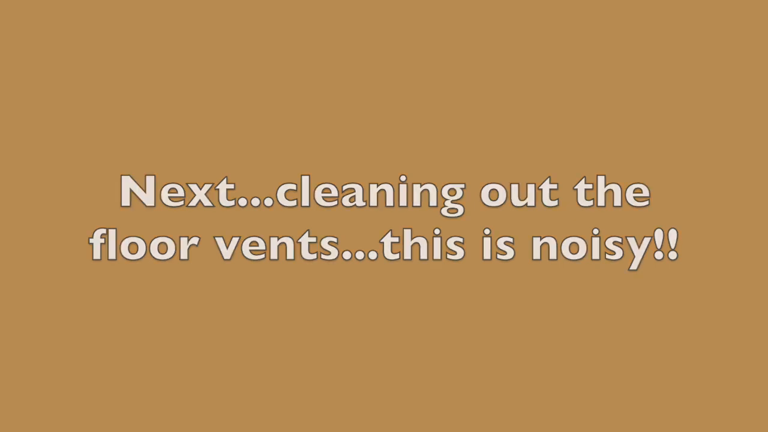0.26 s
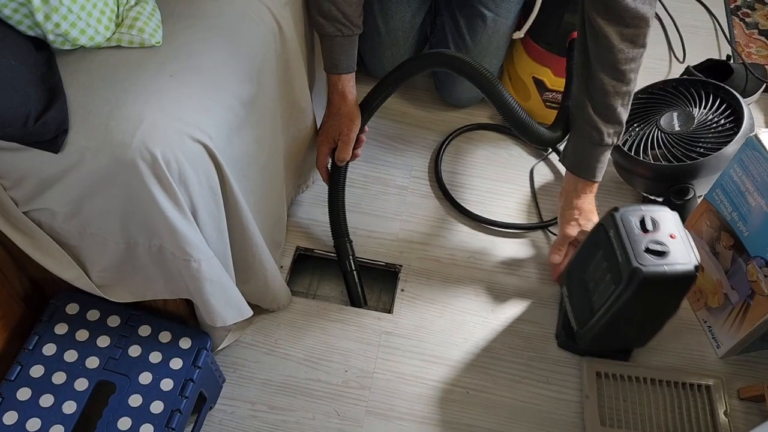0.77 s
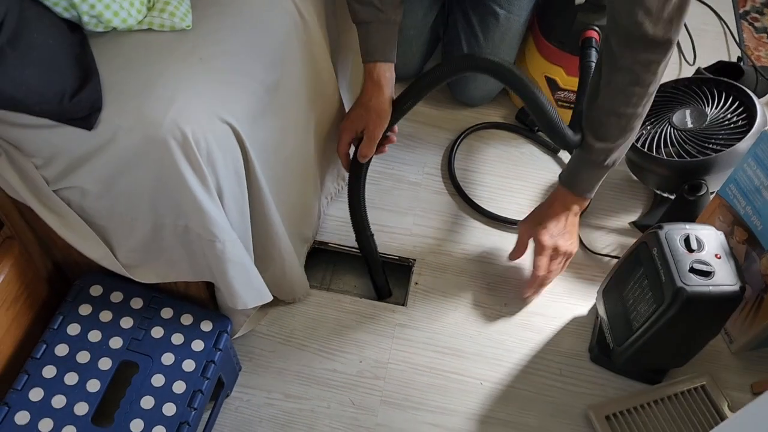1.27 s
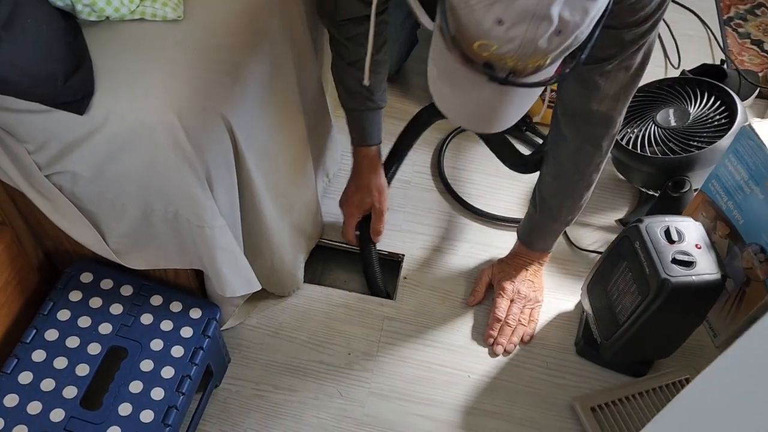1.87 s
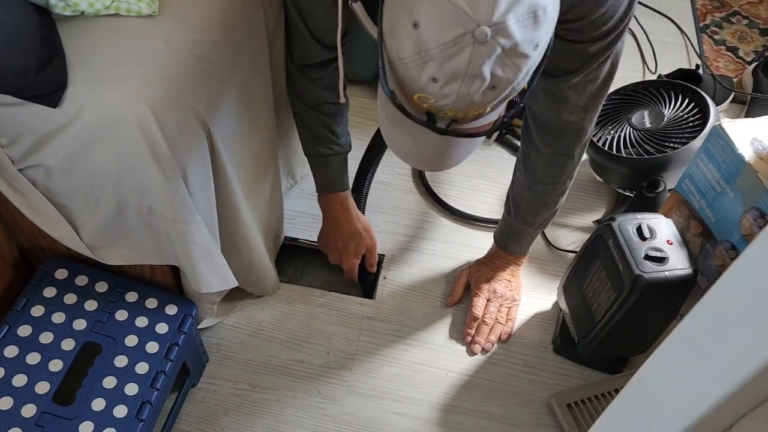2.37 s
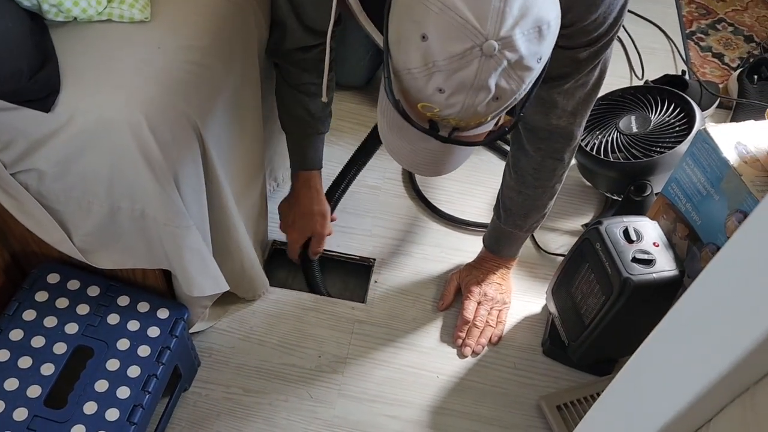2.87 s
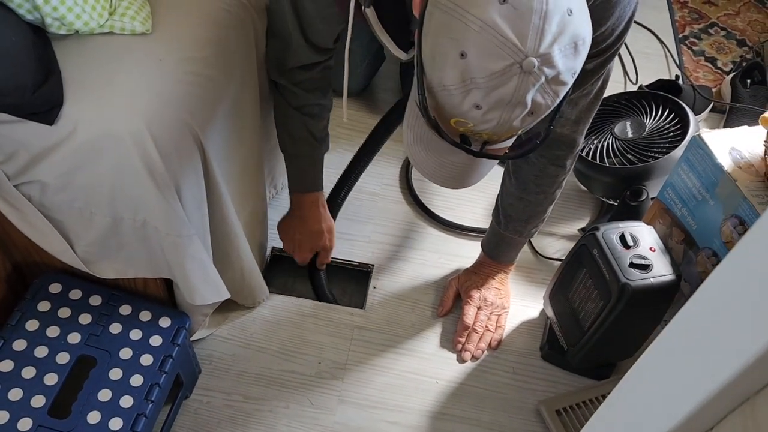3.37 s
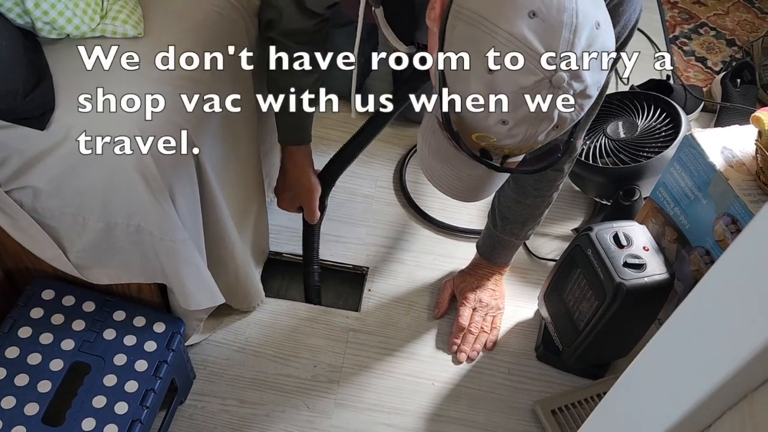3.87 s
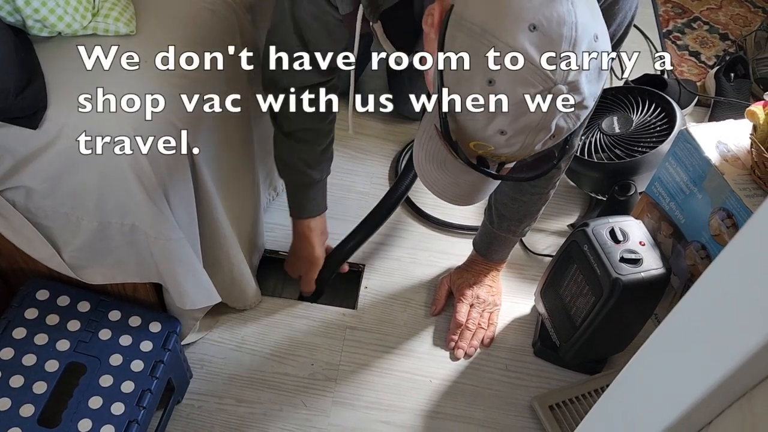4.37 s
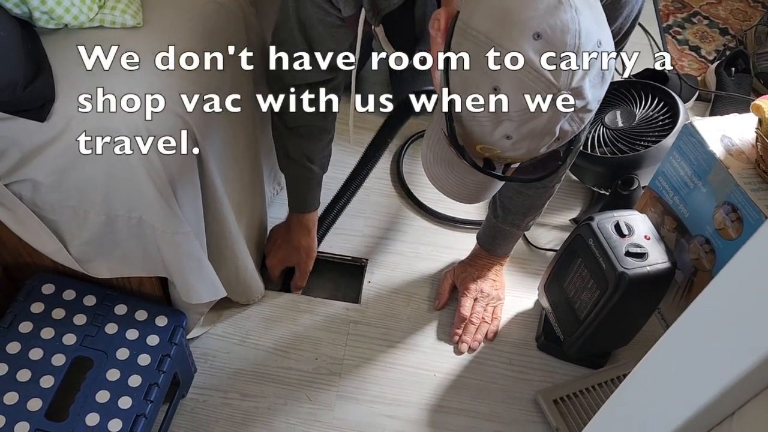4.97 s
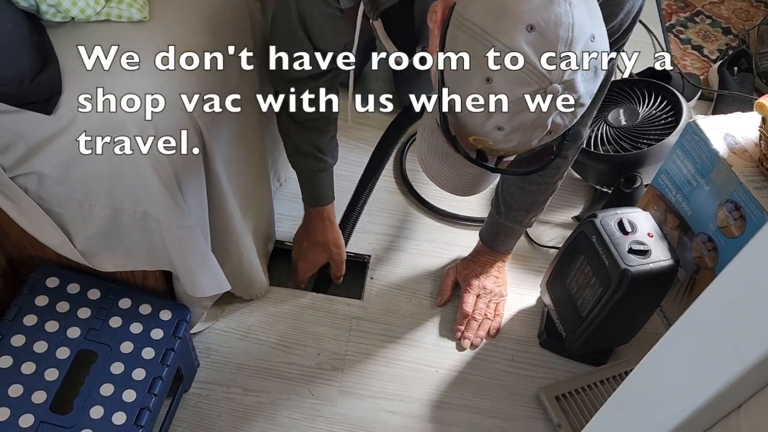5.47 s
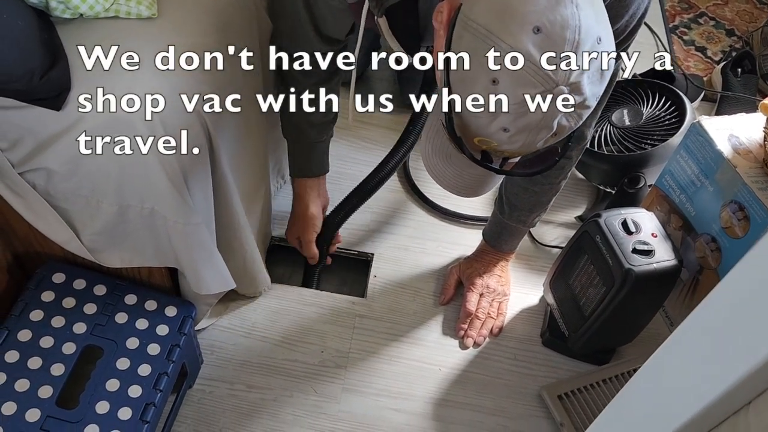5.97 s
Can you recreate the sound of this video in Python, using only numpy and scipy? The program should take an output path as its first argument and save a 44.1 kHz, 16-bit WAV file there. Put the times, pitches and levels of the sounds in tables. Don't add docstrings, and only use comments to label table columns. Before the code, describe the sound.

Silence until about 0.64 s, then a shop vacuum bursts in at once, loud and close, in a small furnished room with short reflections. Over the first second its motor pitch rises slightly to full speed and then stays nearly constant, rising a hair when the nozzle is choked around 4.3 s. A low hum, strong fan whine around 1.5 kHz with higher overtones and a broad rushing airflow run without pause. The whine swells and shifts between left and right. Until about 1.6 s the open hose adds a hollow pipe-like ring. Dull hose bumps and low rubbing occur near 0.8, 1.4, 1.9 and 2.6 s, cluster from 3.4 to 4.7 s, then become sparser, with a last thud near 6.15 s. A thin whistle and chirp of squeezed air sound around 3.6 s, more chirps at 5.55 s. The vacuum is still running at the end.

```python
import sys
import numpy as np
from scipy import signal
from scipy.fft import rfft, irfft, next_fast_len
from scipy.io import wavfile

SR = 44100
rng = np.random.default_rng(int(sys.argv[2]) if len(sys.argv) > 2 else 0)


def attenuation_scalar(level_db):
    decades = np.asarray(level_db, float) / 20
    return 10 ** decades


def output_pcm(signal):
    pcm = np.clip(np.atleast_2d(signal).T, -1, 1) * 32767
    wavfile.write(sys.argv[1], SR, np.round(pcm).astype(np.int16))


N = 274743
TIME_S = np.arange(N) / SR
START_S = 0.64
RUNNING_S = np.clip(TIME_S - START_S, 0, None)


def in_time(rows):
    s, *columns = np.transpose(rows)
    return [np.interp(TIME_S, s, column) for column in columns]


def at_hz(points, hz):
    point_hz, value = np.array(points).T
    return np.interp(np.log(hz + 1), np.log(point_hz), value)


def rms_one(x):
    return x / np.sqrt(np.mean(x ** 2) + 1e-20)


def drift(rate):
    hold = 40
    r = np.exp(-2 * np.pi * rate * hold / SR)
    coarse = rng.standard_normal(N // hold + 2002)
    slow = signal.lfilter([1], [1, -2 * r, r * r], coarse)[2000:]
    return np.interp(np.arange(N) / hold, np.arange(len(slow)), rms_one(slow))


def shaft_hz():
    # start_s, extra_turns_hz
    choke = [
        (2.0, -.05),
        (2.3, .3),
        (3.0, .25),
        (4.3, 1.),
        (4.8, .8),
        (5.6, -.2),
        (6.23, .2),
    ]
    full_hz, shortfall_hz = 260.6, 14.0
    settle_s, settle_bend = 0.39, 1.1
    extra_hz, = in_time(choke)
    return full_hz - shortfall_hz * np.exp(-(RUNNING_S / settle_s) ** settle_bend) + extra_hz


def bloom_db(order):
    # centre_s, length_s, multiple_of_turn, left_gain_db, right_gain_db
    blooms = [(1.35, .9, 24, 7, 13), (2.5, .8, 24, 6, 2), (3.4, .9, 24, 4, 0), (4.4, .9, 24, 0, 10),
              (5.4, .7, 24, 9, 3), (6.15, .7, 24, 9, 9), (1.4, .6, 30, 9, 9), (4.2, 1.4, 30, 17, 9),
              (5.85, 1., 30, 16, 9), (5., 3.5, 1, 5, 3), (5.6, 2., 4, 2, 5), (5., 2.5, 8, 2, 5),
              (1.2, 1.5, 9, 4, 5), (5.7, 2.5, 9, 7, 9), (3.6, 2.5, 14, 7, 0), (3.8, 1.6, 28, 5, 2),
              (4.1, 2., 36, 9, 5), (6., .6, 36, 8, 0)]
    gain_db = np.zeros((2, 1))
    for s, length_s, multiple, left_db, right_db in blooms:
        if multiple == order:
            swell = np.exp(-(2 * (TIME_S - s) / length_s) ** 2)
            gain_db = gain_db + np.array([[left_db], [right_db]]) * swell
    return gain_db


def tone(turns, order, left_db, right_db, lead, flutter_db, wander=0):
    unrest = drift(5.9)
    cycles = order * turns + rng.random() + wander * unrest[::-1]
    left = attenuation_scalar(left_db) * np.sin(2 * np.pi * (cycles + lead))
    right = attenuation_scalar(right_db) * np.sin(2 * np.pi * cycles)
    return attenuation_scalar(flutter_db * unrest) * np.sqrt(2) * np.array([left, right])


def motor(turns):
    # start_s, hum_change_db
    load = [
        (.64, -6),
        (1.1, 0),
        (1.8, 3),
        (2.8, 3),
        (3.3, 2),
        (4.4, 0),
        (5.2, 1),
        (6.23, 0.5),
    ]
    # multiple_of_turn, left_db, right_db, left_lead_cycles, load_share (of the load change)
    hum = [(1, -47.5, -46.5, -0.11, 0.5), (2, -33.7, -33.7, -0.064, 1.), (3, -41.5, -42, 0, 0.91),
           (4, -37.5, -39.5, 0, 0), (5, -53, -52, 0.031, -.5), (8, -44, -46, -0.063, .3),
           (9, -48, -48, -0.027, 0), (13, -45, -55, -0.035, 0.21), (14, -47, -54, -.3, .5),
           (20, -48, -46, 0.23, 0), (26, -57, -62, 0.14, 0), (28, -53, -52, .4, .5),
           (34, -59, -51, 0.17, 0), (36, -56, -58, 0.43, 0), (40, -74, -67, .2, 0), (44, -55, -60, 0.28, 0)]
    load_db, = in_time(load)
    out = 0
    for order, left_db, right_db, lead, share in hum:
        wander = 0.13 * (order > 2.5)
        partial = tone(turns, order, left_db, right_db, lead, flutter_db=1.2, wander=wander)
        out = out + attenuation_scalar(share * load_db + bloom_db(order)) * partial
    return out


def whistle_db(order):
    # multiple_of_turn, left_db, right_db
    whistle_rest = [
        (24, -46, -48),
        (30, -55, -56),
    ]
    rest_db = next(np.array([[left], [right]]) for multiple, left, right in whistle_rest if multiple == order)
    return rest_db + bloom_db(order)


def fan(turns):
    # start_s, left_db, right_db, left_lead_cycles
    whine_6 = [(.66, -20, -22, -0.45), (.75, -22, -22.5, -0.69), (.83, -29, -16.5, -0.78),
               (.97, -35, -19.5, 0.14), (1.07, -28, -33, 0.3), (1.23, -30, -21.5, 0.2),
               (1.42, -27.5, -22.5, 0.05), (1.85, -31.5, -19, -0.1), (2.3, -31.5, -28.5, 0.02),
               (3.2, -32.5, -28.5, -0.22), (3.49, -30, -27, -0.38), (3.95, -27, -36, -0.54),
               (4.75, -30.5, -39, -0.5), (5.5, -35.5, -41, -0.5), (6.23, -34, -43, -0.54)]
    # start_s, left_db, right_db, left_lead_cycles
    whine_12 = [(.66, -35, -35, -0.22), (.74, -32, -31, -0.19), (.91, -44, -38, .2),
                (1.05, -31, -37, -0.19), (1.38, -28, -39, 0.22), (1.51, -29.5, -33, 0.59),
                (1.68, -23.5, -30, 0.34), (1.92, -28.5, -42, 0.72), (2.2, -26, -36, 0.63),
                (2.85, -26, -30.5, 0.81), (3.67, -34, -36.5, 0.98), (4.05, -27.5, -33, 0.91),
                (4.45, -28, -40, 1.), (5.0, -35.5, -36.5, 0.76), (5.65, -27, -36.5, 0.86),
                (6.23, -29, -46, 0.65)]
    # start_s, left_db, right_db, left_lead_cycles
    whine_18 = [(.66, -51, -50, 0.35), (1.0, -36, -36, 0.33), (1.17, -49, -40, 0.095),
                (1.45, -33, -37, -0.64), (1.74, -32, -32, -0.75), (2.15, -43, -36.5, -0.72),
                (2.55, -45, -32, -1.3), (3.13, -42, -35, -1.25), (3.35, -36, -32.5, -1.39),
                (3.7, -33, -32, -1.33), (4.39, -40, -37, -1.28), (4.6, -32.5, -42, -1.4),
                (5.1, -33.5, -38, -1.25), (5.6, -40, -32.5, -1.2), (6.23, -36, -38, -0.86)]
    out = 0
    for order, rows in [(6, whine_6), (12, whine_12), (18, whine_18)]:
        out = out + attenuation_scalar(0.42) * tone(turns, order, *in_time(rows), flutter_db=0.78)
    for order, lead, flutter_db in [(24, 0.27, -1.0), (30, -0.16, 1.0)]:
        left_db, right_db = whistle_db(order)
        out = out + tone(turns, order, left_db, right_db, lead, flutter_db)
    return out


def room(size, hz):
    echo_db, t60_s = -9, 0.12
    after = np.arange(int(t60_s * SR)) / SR
    cloud = rng.standard_normal((2, len(after))) * attenuation_scalar(-60 * after / t60_s) * (after > 0.002)
    cloud = cloud / np.linalg.norm(cloud, axis=1, keepdims=True)
    diffuse = hz ** 2 / (hz ** 2 + 1500 ** 2)
    return 1 + attenuation_scalar(echo_db) * diffuse * rfft(cloud, size)


def airstream(turns):
    # pitch_hz, level_db (per Hz)
    air = [(20, -33), (60, -24), (130, -14.5), (200, -9.5), (420, -13), (750, -3.5), (1050, -9), (2100, -8),
           (3500, -11), (5800, -14.5), (7300, -16.5), (10000, -23.5), (12000, -22.5), (16000, -26.5)]
    # pitch_hz, width_hz, left_db, right_db
    body = [(253, 33, -5.5, -9.5), (366.5, 16, 6.5, 9), (445, 20.5, -7, -12.5), (610, 25, -14, -9),
            (704, 20, 1, 3), (743, 40, -6.5, -8.5), (890, 20, 1, 5), (936, 28, 2, 2.5),
            (1010, 51, 4.5, 8.5), (1154, 58, 6, 8), (1280, 55, 1.5, 1), (1375, 37, 5.5, 3.5),
            (1596, 140, -5.5, 0), (1740, 50, -1.5, -3), (1873, 40, -7, -5), (1907, 27, -10, 8),
            (2355, 40, -9, 3), (2430, 400, 2, 2), (2717, 140, -3, -6.5), (2950, 60, 3, -3),
            (3800, 270, 0.5, -5), (4500, 200, -3.5, -0.5), (5610, 390, -4, 6), (6720, 780, -3, -8),
            (10120, 490, -2.5, -4.5), (10440, 200, 0, 0.5), (10930, 300, -1.5, -6), (12300, 230, -4, -5),
            (13600, 150, 3, -10), (15600, 200, 4, -4)]
    # pitch_hz, likeness (0 apart, 1 same)
    likeness = [(60, 0.84), (130, 1), (290, 0.8), (640, 0.81), (1410, 0.085), (3100, 0.037), (6820, -0.12),
                (15000, 0.01)]
    top_hz = 15730
    lag_s = 0.00009
    size = next_fast_len(N)
    hz = np.arange(size // 2 + 1) * SR / size

    throb = 1 + 0.03 * np.sin(2 * np.pi * turns) + 0.045 * np.sin(4 * np.pi * turns)
    shared, left, right = rfft(throb * rng.standard_normal((3, N)), size)
    alike = np.clip(at_hz(likeness, hz) + 0.076, 0, 0.97)
    pair = np.sqrt(alike) * shared * [np.exp(-2j * np.pi * hz * lag_s), hz ** 0]
    pair = pair + np.sqrt(1 - alike) * np.array([left, right])

    colour_db = at_hz(air, hz)
    for pitch_hz, width_hz, left_db, right_db in body:
        peak = 1 / (1 + (2 * (hz - pitch_hz) / width_hz) ** 2)
        colour_db = colour_db + np.outer([left_db, right_db], peak)
    pair = pair * attenuation_scalar(colour_db) * room(size, hz) * (hz < top_hz)

    roar_db = -0.1 * RUNNING_S - 3 * np.exp(-RUNNING_S / 0.044)
    hiss_db = 0.15 * RUNNING_S
    centres = np.geomspace(60, 14000, 9)
    place = np.interp(np.log(hz + 1), np.log(centres), np.arange(9))
    out = 0
    for k, centre in enumerate(centres):
        band = irfft(pair * np.clip(1 - abs(place - k), 0, 1), size)[:, :N]
        bright = np.clip(np.log2(centre / 1200), 0, 1)
        swell_db = (1 - bright) * (roar_db - roar_db.mean()) + bright * (hiss_db - hiss_db.mean())
        if centre < 300:
            swell_db = 0
        out = out + band * attenuation_scalar(swell_db + 0.6 * drift(5))
    return attenuation_scalar(-24) * rms_one(out)


def rubbing():
    # peak_s, length_s, rumble_db
    rubs = [(.84, 0.14, -36), (1.376, .05, -32), (1.55, .06, -41), (1.91, 0.085, -35), (2.73, .04, -43),
            (3.26, .05, -47), (3.5, 0.17, -33), (3.777, 0.14, -32.5), (4.082, 0.12, -33), (4.393, .15, -38),
            (4.673, 0.047, -37), (4.973, .03, -34), (5.06, .06, -40), (5.8, .07, -40), (6.17, 0.13, -36)]
    rest_db, attack_share = -56, 0.42
    out = attenuation_scalar(rest_db)
    for s, length_s, rub_db in rubs:
        side_s = length_s * np.where(TIME_S < s, attack_share, 1)
        out = out + attenuation_scalar(rub_db) * np.exp(-((TIME_S - s) / side_s) ** 2)
    return out


def hose():
    # start_s, peak_db, ring_hz, t60_s
    knocks = [(0.829, -33, 85.5, 0.071), (1.38, -23, 90, .035), (2.582, -32, 220, .03),
              (3.47, -33, 110, .035), (3.70, -27, 60, .05), (3.829, -23, 90, .03), (4.045, -27, 81, .035),
              (4.065, -22.5, 180, 0.052), (4.151, -33, 160, 0.025), (4.371, -25, 70, .04),
              (4.45, -23, 152, .03), (4.647, -21, 195, 0.035), (5.08, -39, 135, .035),
              (5.45, -39, 170, .035), (6.151, -23, 99, 0.031)]
    rumble_band = signal.butter(3, [34, 130], "band", fs=SR, output="sos")
    rumble = signal.sosfilt(rumble_band, rng.standard_normal(N))
    out = rms_one(rumble) * rubbing() * attenuation_scalar(-7.0)
    after = np.arange(int(0.2 * SR)) / SR
    for s, peak_db, ring_hz, t60_s in knocks:
        soft_onset = 1 - np.exp(-after / 0.0041)
        knock = soft_onset * attenuation_scalar(-60 * after / t60_s) * np.sin(2 * np.pi * ring_hz * after)
        at = round(s * SR)
        out[at:at + len(after)] += attenuation_scalar(peak_db + 8) * knock[:N - at]
    out = signal.sosfilt(signal.butter(2, 30, "high", fs=SR, output="sos"), out)
    return out * attenuation_scalar(np.array([[0.2], [-0.2]]))


def pipe():
    pitch_hz, width_hz, level_db = 936, 20, -36.5
    centre_s, length_s = 1.18, 0.93
    r, w = np.exp(-np.pi * width_hz / SR), 2 * np.pi * pitch_hz / SR
    ring = signal.lfilter([1, 0, -1], [1, -2 * r * np.cos(w), r * r], rng.standard_normal(N))
    clear = np.exp(-(2 * (TIME_S - centre_s) / length_s) ** 4)
    return rms_one(ring) * clear * attenuation_scalar(level_db + np.array([[1.5], [-1.5]]))


def nozzle():
    # centre_s, length_s, pitch_hz, level_db, left_over_right_db
    edge = [
        (3.59, 0.13, 4300, -38, -6),
        (3.684, 0.031, 2100, -35, 0),
        (5.557, 0.071, 1397, -36.5, 11),
        (5.553, 0.04, 2340, -35, 0),
    ]
    out = 0
    for s, length_s, pitch_hz, level_db, pan_db in edge:
        puff = np.exp(-(2 * (TIME_S - s) / length_s) ** 4) * attenuation_scalar(level_db + 2.0 * drift(25))
        sing = np.sqrt(2) * np.sin(2 * np.pi * pitch_hz * TIME_S)
        out = out + puff * sing * attenuation_scalar(pan_db * np.array([[0.5], [-0.5]]))
    return out


def scene():
    turns = np.cumsum(shaft_hz() + 0.12 * drift(4.6)) / SR
    return motor(turns) + fan(turns) + airstream(turns) + hose() + pipe() + nozzle()


def low_pass(x):
    return signal.sosfilt(signal.butter(12, 17020, fs=SR, output="sos"), x)


def record(dry):
    gate = np.clip((TIME_S - START_S) / 0.00025, 0, 1)
    return low_pass(dry * gate)


dry = scene()
out = record(dry)
output_pcm(out)
```